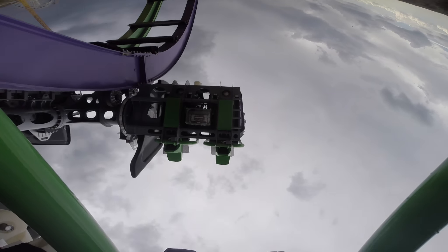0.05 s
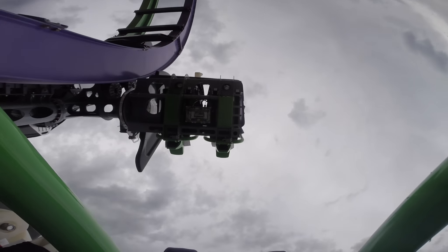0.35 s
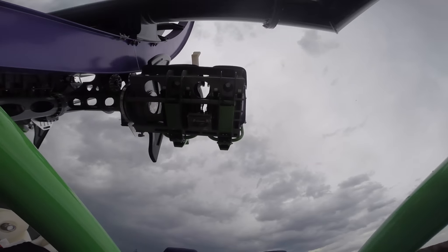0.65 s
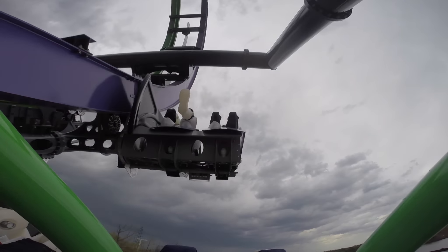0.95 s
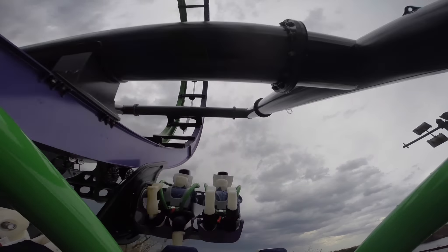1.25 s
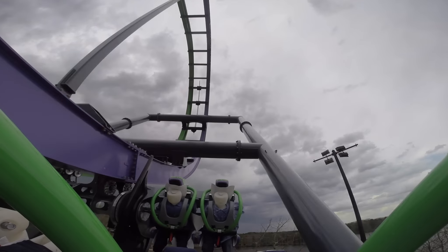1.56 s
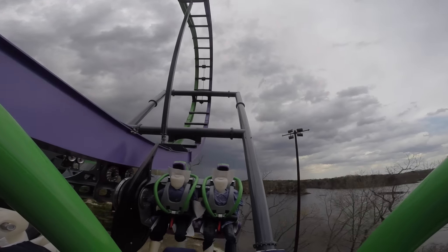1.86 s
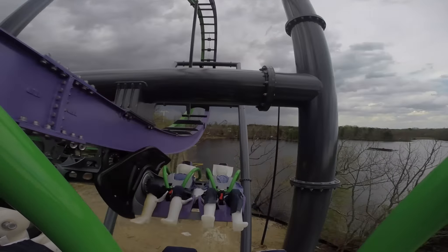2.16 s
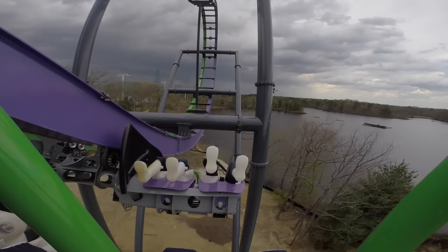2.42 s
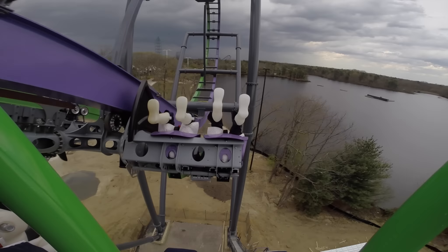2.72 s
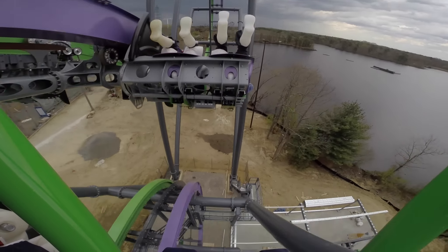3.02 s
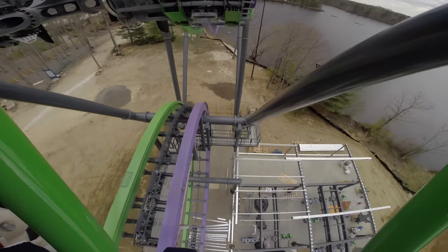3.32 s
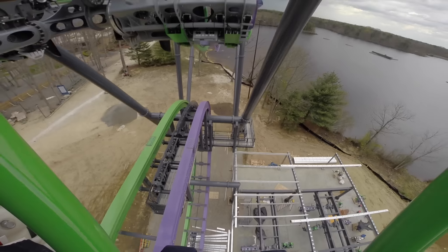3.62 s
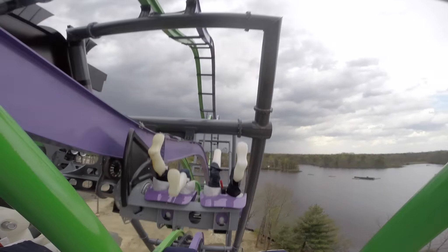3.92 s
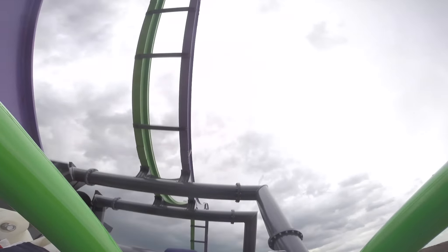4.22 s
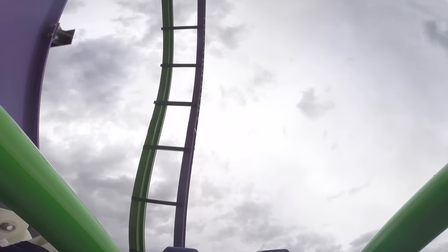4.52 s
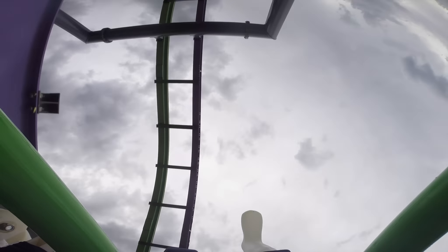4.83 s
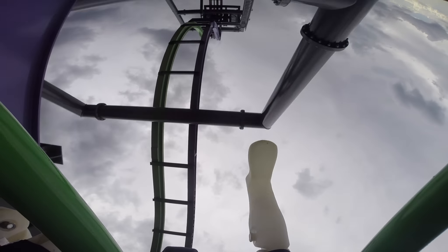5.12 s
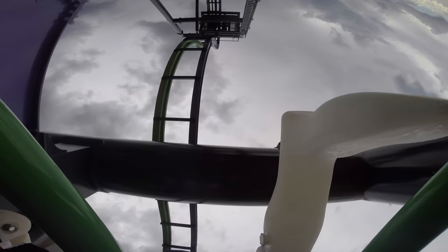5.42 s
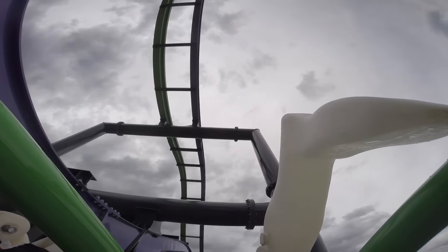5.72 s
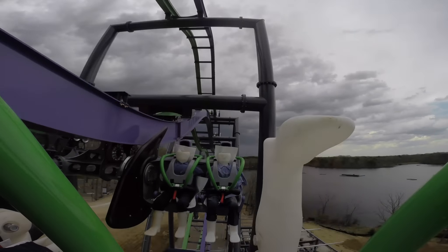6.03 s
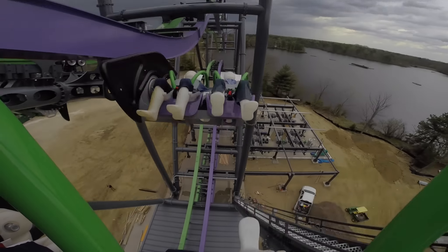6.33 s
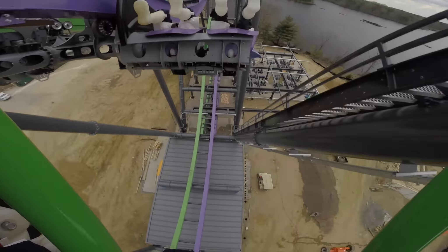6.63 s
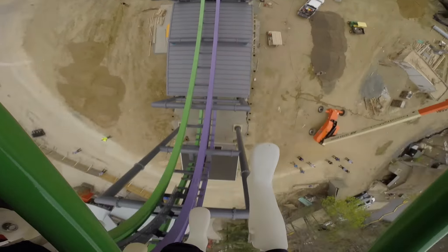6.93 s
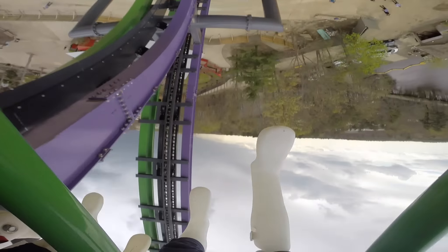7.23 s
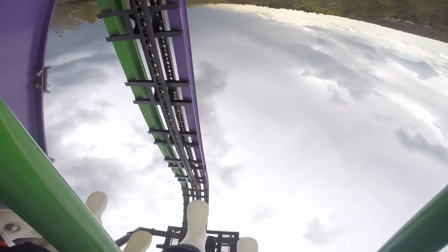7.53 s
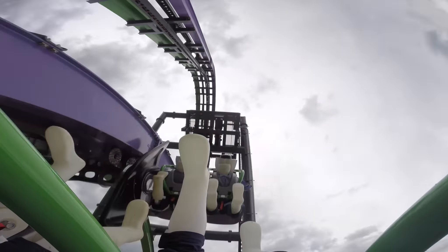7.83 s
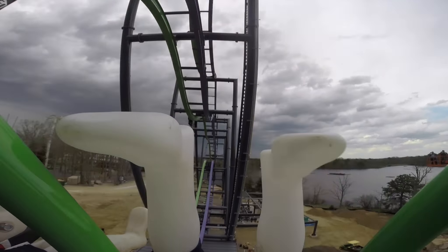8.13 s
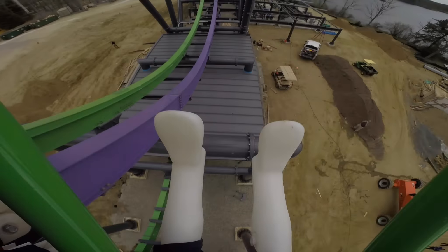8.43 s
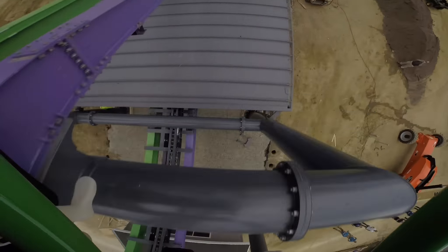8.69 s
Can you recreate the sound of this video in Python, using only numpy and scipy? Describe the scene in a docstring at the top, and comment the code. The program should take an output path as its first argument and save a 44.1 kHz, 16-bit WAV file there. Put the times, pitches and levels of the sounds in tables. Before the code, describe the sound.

A roller coaster car drones deeply throughout, throbbing and swelling over a low wheel roar and faint hiss, heard from inside a housing fixed to the seat. Wind buffets the microphone hard for the first half second, then eases, leaving the rumble, light crackles and weaker gusts. Strong, sputtering wind returns from 3 to 3.9 seconds with small knocks and faint pings. Another blast comes at about 4.5 seconds with sharp knocks, followed by a ringing steel clank and rattle around 4.7. Track joints thump dully near 2.4, 3.6, 4.7, 5.4, 6.6, 7.5 and 8.1 seconds, heaviest at 5.4. Moderate gusts come and go between 5 and 6.2 seconds, then drop back. The wind surges again from 7.2 to 8 seconds. A sharp tick strikes the housing at about 8.5, and a last strong gust and jolt arrive around 8.7.

```python
"""A roller coaster car drones deeply as the track forces its main resonance into vibration.
It is heard from inside a housing fixed to the seat. The wheels roar and hiss, joints jolt and clank,
loose parts knock, a thin panel pings, metal squeaks and the strained mount crackles.
Whenever the seat turns into the airstream, turbulence buffets the housing and sputters in its
resonances; air hisses at its seams, and small hard objects tick against it."""
import sys
import numpy as np
from scipy import signal
from scipy.fft import rfft, irfft, next_fast_len
from scipy.io import wavfile
from scipy.ndimage import uniform_filter1d

SR = 44100
rng = np.random.default_rng(int(sys.argv[2]) if len(sys.argv) > 2 else 0)


def file_out(sig):
    """Save sig as 16-bit WAV at sys.argv[1]."""
    # one column per channel
    cols = np.atleast_2d(sig).T
    # limit, then scale
    lim = np.clip(cols, -1, 1)
    pcm = np.round(lim * 32767).astype(np.int16)
    wavfile.write(sys.argv[1], SR, pcm)


N = 390726
TIME = np.arange(N) / SR

# Level curves. Each row: time in seconds, level in dB.
SEAM_LEVEL = [(0, -84), (1.5, -78.5), (2.0, -77), (3.5, -76.5), (3.9, -84.5), (6.3, -86.5), (6.9, -82),
              (8.86, -86.5)]
CRACKLE_LEVEL = [(0, -54), (.1, -56), (.2, -49), (.3, -66), (.7, -71), (.8, -55), (1.35, -60), (1.65, -54),
                 (1.85, -68.5), (2.65, -54.5), (3.0, -76), (3.9, -77.5), (5.5, -76), (6.6, -58),
                 (8.3, -65.5), (8.7, -49)]
HISS_LEVEL = [(0, -75.5), (.6, -59.5), (.92, -61.5), (.98, -71), (1.04, -56), (1.2, -62.5), (1.6, -56.5),
              (1.85, -62.5), (2.4, -61.5), (3.2, -60.5), (3.8, -66), (5.3, -68.5), (6.5, -62.5),
              (7.45, -62), (8.2, -67), (8.86, -64.5)]
ROAR_LEVEL = [(0, -32.5), (.5, -36.5), (1.1, -44.5), (2.3, -44), (2.7, -49.5), (3.6, -42), (4.3, -48.5),
              (4.9, -48), (6.5, -37.5), (7.05, -47), (7.35, -35.5), (8, -39), (8.35, -45), (8.6, -35),
              (8.86, -40)]
DRONE_LEVEL = [(0, -27), (1.5, -22), (1.95, -26), (2.3, -24.5), (2.7, -29.5), (3.4, -28), (4.4, -31.5),
               (6.2, -29.5), (6.6, -31), (7.2, -30), (8.86, -32)]
# Noise spectra. Each row: frequency in Hz, relative spectral density in dB.
CRACK_SPECTRUM = [(700, 7), (2200, 8), (3700, -1.5), (5200, -8), (6400, -8), (8000, -15.5), (10800, -16.5),
                  (15000, -34)]
TICK_SPECTRUM = [(1500, -27), (2300, 9), (4000, -7), (7400, -6), (9500, -3), (10500, -15), (12000, -10),
                 (15000, -7)]
RATTLE_SPECTRUM = [(1000, -7.5), (2500, 2), (3600, 1.5), (5200, -3), (6400, -1), (8000, -12), (11000, -18),
                   (15000, -27.5)]
CLANK_SPECTRUM = [(500, -14), (1200, -6), (2000, -2), (3000, 4.5), (4200, -3), (5000, -15), (5800, -5.5),
                  (7800, -27), (11000, -28.5), (15000, -43)]
SWISH_SPECTRUM = [(600, -19), (1500, -3), (2300, -1.5), (3100, 1.5), (4000, -11.5), (5000, -21.5),
                  (6000, -20), (9000, -37)]
HISS_SPECTRUM = [(150, -2.5), (300, 3.5), (520, 1), (950, 2), (1180, -6), (1700, -1.5), (2400, -7),
                 (3500, -6), (4100, -14.5), (4550, -12), (5200, -24), (6100, -21.5), (8000, -24.5),
                 (11000, -28.5), (15000, -42)]
ROAR_SPECTRUM = [(85, -19.5), (115, 7), (150, 0), (200, -5), (280, -10), (400, -27), (800, -41)]
SWAY_SPECTRUM = [(12, -11), (20, 1), (27, -11), (38, -10.5), (50, -13), (64, -5), (80, -24), (100, -38)]
# Brief events. Each row: start in seconds, level in dB.
SQUEAKS = [(.61, -80.5), (4.9, -84.5), (8.075, -82)]
CRACKS = [(0.807, -52), (.84, -62), (0.906, -51), (0.921, -53), (0.94, -50), (1.146, -55), (1.299, -48.5),
          (1.657, -48), (1.71, -57), (1.748, -51), (2.199, -53), (2.392, -49), (2.683, -66), (6.721, -57)]
PINGS = [(2.542, -58), (2.57, -55), (2.635, -62), (2.695, -60), (2.766, -53), (3.6, -33.5), (3.745, -40.5),
         (3.783, -43.5), (3.933, -41), (5.027, -35.5), (8.548, -35.5), (8.629, -38), (8.731, -31)]
TICKS = [(4.391, -44.5), (4.424, -53), (8.4713, -20.5)]
# Modes of housing and steel frame. Each row: frequency in Hz, gain in dB, 60 dB decay (t60) in seconds.
TICK_MODES = [(2400, -15, .016), (2950, -18, .014), (3400, -19, .014), (4650, -19, .01), (5900, -15, .011),
              (6600, -14, .009), (7450, -3, .007), (8400, -13, .009), (10500, -11, .004)]
FRAME_MODES = [(3020, -2.5, .4), (3180, -4, .45), (4076, -11, .5), (5580, -14, .5), (6698, -9, 0.19)]
# The frame's crowded modes: lowest and highest frequency in Hz.
FRAME_BAND_HZ = [1800, 9000]
# Loose parts, plus a few sharp eddy slaps on the housing (at 3.037 s and 4.544 to 4.566 s), all as damped
# gliding tones. Each row: start in seconds, pitch in Hz, level in dB, t60 in seconds, glide in octaves.
KNOCKS = [(1.821, 1980, -47.5, 0.042, 1.2), (2.991, 2340, -38.5, .023, -0.15),
          (3.037, 2366, -31.5, 0.022, -0.36), (3.089, 663, -34.5, 0.074, -1.65),
          (3.21, 460, -31.5, 0.12, -1.86), (3.254, 348, -36, .09, -0.15), (4.544, 2168, -21, 0.012, -0.09),
          (4.549, 2210, -22, 0.023, 0.2), (4.566, 730, -28, 0.061, -0.67), (4.891, 406, -34, 0.066, 0.3),
          (5.1, 678, -35, 0.037, -0.62), (5.958, 343, -31, 0.063, -0.4), (7.133, 1210, -36, 0.048, 1.44),
          (7.157, 759.8, -46, 0.065, 0.41), (8.659, 3574, -32, 0.014, 0.073),
          (8.817, 425, -37.5, .035, -.3)]
# Track joints. Each row: start in seconds, thump level in dB, rattle level in dB.
JOLTS = [(0.084, -40, -58), (0.181, -35, -61), (0.2, -25, -66), (0.801, -32, -62.5), (2.388, -22, -70),
         (2.475, -20.5, -70), (2.974, -48, -56.5), (3.647, -18.5, -75), (4.612, -36, -46),
         (4.719, -18, -50), (5.392, -13, -54.5), (5.408, -26, -64), (6.579, -18, -65), (7.55, -18, -66.5),
         (8.066, -21, -48.5), (8.082, -25, -75), (8.744, -18, -55)]
# Blows on steel. Each row: start in seconds, level in dB, t60 in seconds.
CLANKS = [(4.61, -40.5, 0.91), (4.709, -40, 0.22)]
# Passing girders. Each row: time in seconds, level in dB, half width in seconds.
GIRDERS = [(2.322, -64.5, .05), (4.314, -60.5, 0.062), (5.673, -62.5, 0.099), (5.829, -54.5, 0.055),
           (7.192, -50, 0.015), (8.257, -64, 0.053)]
# Turns into the airstream. Each row: time of full strength in seconds, hold in seconds, level in dB,
# bass boost in dB, fall in dB per second.
GUSTS = [(0, 0.11, 0.5, 2.5, 98.5), (0.104, 0.11, 3, -2, 48.5), (0.806, 0.035, -14, 4, 72.5),
         (1.425, 0.22, -15, -4, 107), (2.553, 0.11, -20, -25, 62), (3.109, 0.099, 2.5, -6, 112),
         (3.458, 0.23, 4.5, -0.5, 118), (3.776, 0.18, -8, -8, 107), (4.4, .01, -5, -6.5, 87),
         (4.521, 0.071, 1, -0.5, 122), (4.71, 0.03, 0, 1.5, 42), (5.023, 0.04, -3.5, 5, 93),
         (5.16, 0.21, -6, 1.5, 202), (5.6, 0.26, -11, -3, 60.5), (5.915, 0.23, -6, -4, 35),
         (6.303, 0.039, -13.5, -17, 53), (6.945, 0.016, -11.5, -2, 115), (7.235, 0.28, -2, -5, 97),
         (7.52, 0.097, -10.5, 12.5, 95), (7.685, 0.11, -1.5, 2, 108), (7.913, 0.06, 5.5, 2, 111.5),
         (8.265, 0.043, -10, -1.5, 3), (8.673, 0.032, 7.5, -9.5, 102)]
# The bass boost fades out across this band: lower and upper edge in Hz.
BASS_FADE_HZ = [700, 1200]
# Resonances of the housing. Each row: frequency in Hz, width in Hz, level in dB.
HOUSING_MODES = [(283, 160, -49), (468, 392, -44.5), (862.5, 95, -50.5), (1170, 160, -48),
                 (1400, 420, -55.5), (2050, 510, -52.5), (2350, 310, -52.5), (2558, 290, -54.5),
                 (3600, 290, -65), (4584, 220, -72), (5780, 670, -76.5), (8800, 6700, -85)]
# Eddies that slap the housing. Each row: start in seconds, level in dB, centre in Hz,
# spread in octaves, t60 in seconds.
EDDIES = [(0.01, -19.5, 740, 0.37, 0.028), (.082, -34, 2400, 0.49, 0.032), (0.101, -35, 2400, .6, 0.03),
          (0.153, -28, 2370, 0.14, 0.013), (2.68, -34, 3030, 0.28, 0.027), (2.924, -42, 2400, 0.5, 0.026),
          (3.093, -23, 2947, 0.19, 0.025), (3.119, -33.5, 2470, 0.49, 0.05),
          (3.163, -26, 2410, 0.54, 0.022), (3.183, -29, 2450, 0.5, 0.015), (3.209, -32, 2450, 0.24, 0.04),
          (3.233, -30.5, 2533, 0.25, 0.02), (3.251, -29.5, 2500, 0.19, 0.015),
          (3.342, -33.5, 560, 1, 0.053), (3.365, -28, 1020, 0.88, 0.054), (3.393, -22, 2000, 1, 0.013),
          (3.601, -41, 2200, 0.45, 0.023), (3.628, -37, 2280, 0.44, .05), (3.646, -31, 550, 0.92, 0.041),
          (3.814, -40, 2400, .5, 0.021), (3.982, -47, 2130, .3, 0.02), (4.454, -38.5, 571, 0.71, 0.036),
          (4.497, -31.5, 453, 0.95, 0.032), (4.505, -26, 1300, 1.26, 0.025), (4.535, -33, 2350, .25, 0.023),
          (4.547, -31, 550, 0.75, 0.024), (4.565, -21.5, 493, 0.7, 0.021), (4.692, -37, 2400, 0.52, 0.025),
          (4.737, -36, 600, 1.1, 0.028), (4.777, -36, 2300, .5, .02), (4.885, -40, 2440, 0.28, 0.022),
          (4.936, -36.5, 2400, 0.23, 0.018), (5.058, -47, 500, 0.88, .03),
          (5.148, -39.5, 2410, 0.65, 0.028), (5.162, -40, 2395, 0.45, 0.041),
          (5.198, -38.5, 2480, 0.37, 0.039), (5.246, -36.5, 2100, 0.18, 0.021),
          (5.275, -28.5, 2457, 0.14, 0.022), (5.361, -36, 2450, 0.55, 0.025),
          (5.378, -30, 2340, 0.68, 0.033), (5.784, -43.5, 600, 2.4, 0.068), (5.964, -36, 2300, 0.43, 0.018),
          (5.98, -41, 447, 0.6, 0.041), (6.004, -35, 1470, 0.52, 0.015), (6.148, -41.5, 1800, 1.4, 0.05),
          (6.372, -33.5, 1510, 0.4, 0.02), (7.238, -27, 464, 0.88, 0.029), (7.256, -35, 2400, 0.28, 0.032),
          (7.311, -35, 2400, 0.49, 0.024), (7.331, -28.5, 503, 1.34, 0.053), (7.438, -35, 2450, 0.27, .025),
          (7.452, -22, 1100, 0.8, 0.026), (7.509, -33, 2284, 0.75, 0.027), (7.82, -38, 2400, 0.22, 0.023),
          (7.868, -37, 399, 1.1, 0.017), (7.883, -35, 2440, 0.55, 0.024), (7.961, -36.5, 1510, 1.6, 0.031),
          (8.291, -34.5, 2542, 0.25, 0.022), (8.547, -32, 1979, .7, 0.025), (8.554, -34, 2403, 0.51, 0.055),
          (8.61, -26, 1710, 1.8, 0.038), (8.659, -34, 2700, 0.42, 0.013), (8.729, -34, 1700, 1.34, 0.024)]
# Mode strength against which a slap is shared out. Each row: frequency in Hz, level in dB.
SLAP_REFERENCE = [(700, -45), (1200, -42.5), (2000, -45.5)]
# Bends press wheels into rails. Each row: time and length in seconds, drone and roar levels in dB.
BENDS = [(.02, 0.049, -22.5, -61), (0.241, 0.041, -17.5, -34.5), (0.4, 0.052, -22, -51),
         (0.825, 0.05, -24.5, -32), (1.5, 0.033, -24.5, -50), (1.303, 0.018, -25.5, -49),
         (2.158, 0.074, -18.5, -41.5), (3.259, 0.14, -25.5, -64), (3.524, 0.061, -25, -28),
         (3.673, 0.03, -15, -40), (4.018, 0.019, -22.5, -57), (4.104, .03, -46, -35),
         (4.522, 0.057, -45, -33.5), (4.643, 0.062, -17.5, -56), (4.756, 0.074, -21, -30.5),
         (4.96, 0.061, -23.5, -42), (5.077, 0.12, -35, -35.5), (5.182, 0.059, -36, -32.5),
         (5.399, 0.034, -36, -27), (5.68, 0.061, -24.5, -40), (5.959, 0.057, -41, -52),
         (5.807, 0.036, -50, -34), (6.03, 0.035, -18, -39), (6.369, 0.015, -22, -35),
         (6.533, 0.077, -22.5, -39), (6.699, 0.092, -19, -61), (6.974, 0.046, -23, -50),
         (7.571, 0.014, -17.5, -25.5), (7.742, 0.093, -22, -50), (7.99, 0.039, -26, -29.5),
         (8.081, 0.016, -18.5, -28), (8.362, 0.46, -38.5, -56), (8.702, 0.32, -27.5, -47)]
# The car goes light. Each row: time and length in seconds, depth in dB.
LULLS = [(0.494, 0.046, 6), (0.67, 0.078, 10.5), (1.002, .025, 12), (1.065, 0.019, 10), (1.426, 0.024, 16),
         (1.792, 0.09, 16.5), (2.57, 0.058, 8), (3.884, 0.091, 16), (4.863, 0.012, 16), (5.327, 0.072, 7),
         (5.529, 0.092, 27), (6.213, 0.029, 18), (6.786, 0.11, 15), (7.467, 0.046, 9), (7.855, 0.032, 11)]
# The seat swings on its pivot. Each row: time in seconds, level in dB.
SWINGS = [(.16, -29), (.88, -25), (1.2, -32), (1.6, -41), (1.97, -37), (2.32, -28), (3.101, -27.5),
          (4.17, -29.5), (4.43, -33.5), (5.95, -33), (6.599, -27), (7.08, -31.5), (7.52, -30.5),
          (8.45, -28.5)]
# The car's resonance stiffens under load. Each row: time in seconds, frequency in Hz.
DRONE_PITCH = [(0, 77.7), (.55, 85.63), (.7, 78.7), (1.15, 87.33), (1.5, 91.57), (1.85, 80.43),
               (2.13, 98.4), (2.6, 82.4), (5.4, 81.1), (5.75, 76.6), (6.05, 82.27), (6.7, 76.44),
               (7.55, 73.45), (8, 79.35), (8.86, 83.1)]


def from_db(db):
    """Amplitude grows tenfold with every 20 dB."""
    return np.exp(np.asarray(db) * (np.log(10) / 20))


def rms_one(x):
    """Normalisation to unit power."""
    return x / np.sqrt(np.mean(x ** 2) + 1e-20)


def in_time(curve):
    """Linear interpolation of a curve at every sample."""
    return np.interp(TIME, *np.transpose(curve))


def noise(spectrum):
    """Spectral shaping of white noise, at unit power, with steep skirts beyond the given band."""
    hz, db = np.transpose(spectrum)
    size = next_fast_len(N)
    log_hz = np.log(np.maximum(np.arange(size // 2 + 1) * SR / size, 1))
    beyond = np.abs(log_hz - np.clip(log_hz, np.log(hz[0]), np.log(hz[-1])))
    gain = from_db(np.interp(log_hz, np.log(hz), db) - 40 * beyond)
    return rms_one(irfft(rfft(rng.standard_normal(size)) * gain, size)[:N])


def drift(rate_hz):
    """Low-passed noise gives a smooth fluctuation of unit spread, its extremes rounded off."""
    step, settle = 40, 2000
    pole = np.exp(-2 * np.pi * rate_hz * step / SR)
    white = rng.standard_normal(N // step + settle + 2)
    slow = signal.lfilter([1], [1, -2 * pole, pole * pole], white)[settle:]
    rounded = rms_one(np.tanh(rms_one(slow) / 2))
    return np.interp(np.arange(N) / step, np.arange(len(slow)), rounded)


def rough_noise(spectrum, depth_db, rate_hz):
    """Random amplitude modulation roughens a noise of unit power."""
    return rms_one(noise(spectrum) * from_db(depth_db * drift(rate_hz)))


def resonant_noise(hz, width_hz):
    """Two resonators in series select a steep-sided band of noise, at unit power."""
    r = np.exp(-np.pi * width_hz / SR)
    section = [(1 - r * r) / 2, 0, (r * r - 1) / 2, 1, -2 * r * np.cos(2 * np.pi * hz / SR), r * r]
    return rms_one(signal.sosfilt([section, section], rng.standard_normal(N)))


def ring(clicks, hz, t60):
    """A damped oscillator answers each impulse with a decaying sine of the same height."""
    r, w = from_db(-60 / (t60 * SR)), 2 * np.pi * hz / SR
    return signal.lfilter([0, np.sin(w)], [1, -2 * r * np.cos(w), r * r], clicks + 1e-18)


def clicks_at(times, db):
    """Ideal impacts: one impulse at each time."""
    out = np.zeros(N)
    out[np.clip(np.round(np.asarray(times) * SR).astype(int), 0, N - 1)] = from_db(db)
    return out


def bursts(times, db, rise_s, t60):
    """Transient envelopes: a quick rise, then exponential decay."""
    out = np.zeros(N + 2 * SR)
    for s, gain, rise, length in zip(*np.broadcast_arrays(times, from_db(db), rise_s, t60)):
        age = np.arange(int(length * SR)) / SR
        shape = (1 - np.exp(-(age / rise) ** 2)) * from_db(-60 * age / length)
        start = int(np.clip(s * SR, 0, N))
        out[start:start + len(age)] += gain * shape / shape.max()
    return out[:N]


def swell(s, length_s):
    """A Gaussian bell in time; its length is the full width at half height."""
    return np.exp2(-np.minimum((2 * (TIME - s) / length_s) ** 2, 60))


def squeaks(fundamental_hz=3060):
    """Friction of metal on metal sounds a second and a third harmonic."""
    phase = 2 * np.pi * fundamental_hz * TIME
    tone = np.sin(2 * phase) + from_db(-2) * np.sin(3 * phase)
    return bursts(*np.transpose(SQUEAKS), rise_s=0.03, t60=0.23) * tone


def seam_hiss():
    """Flow noise at the housing's seams fills one thin, high band."""
    return from_db(in_time(SEAM_LEVEL)) * resonant_noise(hz=5920, width_hz=990)


def mount_crackle():
    """Stick-slip: the strained mount yields in many faint slips and a few clear cracks."""
    place, size = rng.random((200, 2)).T
    slips = bursts(place * N / SR, 10 * size - 2.5, rise_s=0.00048, t60=0.012)
    cracks = bursts(*np.transpose(CRACKS), rise_s=0.00056, t60=0.013)
    return (from_db(in_time(CRACKLE_LEVEL)) * slips + cracks) * noise(CRACK_SPECTRUM)


def panel_pings(hz=1203, t60=0.053, scatter=0.0187):
    """Free vibration of a thin panel, at a slightly different pitch for each tap."""
    pitches = hz * (1 + rng.uniform(-scatter, scatter, len(PINGS)))
    return sum(bursts([s], [db], rise_s=0.0012, t60=t60) * np.sin(2 * np.pi * pitch * TIME)
               for (s, db), pitch in zip(PINGS, pitches))


def housing_ticks(crack_db=-8):
    """A small, hard impact gives a broadband crack and excites the housing's high modes."""
    at, level_db = np.transpose(TICKS)
    impacts = clicks_at(at, level_db)
    modes = sum((-1) ** k * from_db(db) * ring(impacts, hz, t60)
                for k, (hz, db, t60) in enumerate(TICK_MODES))
    return modes + bursts(at, level_db + crack_db, rise_s=0.0001, t60=0.0083) * noise(TICK_SPECTRUM)


def knocks(wobble_rad=0.54, rough_db=2.5):
    """Loose parts chatter, and a few hard eddies slap the housing, in damped, gliding tones, randomly modulated
    in phase and level."""
    out, chatter = np.zeros(N), wobble_rad * drift(150)
    for s, hz, db, t60, glide in KNOCKS:
        near = slice(int(s * SR), int((s + t60) * SR))
        pitch = hz * 2 ** (glide * (TIME[near] - s) / t60)
        phase = 2 * np.pi * np.cumsum(pitch) / SR + chatter[near]
        out[near] += bursts([s], [db], rise_s=0.0012, t60=t60)[near] * np.sin(phase)
    return out * from_db(rough_db * drift(130))


def mode_cloud(s, db, t60):
    """Crowded inharmonic frame modes; damping rises with frequency, and t60 holds at 3000 Hz."""
    place, phases = rng.random(size=(70, 2)).T
    low, high = FRAME_BAND_HZ
    hz = low * (high / low) ** place
    age = np.arange(int(t60 * SR)) / SR
    gains = from_db(np.interp(hz, *np.transpose(CLANK_SPECTRUM)))
    gains = gains / np.sqrt(np.sum(gains ** 2) / 2)
    cloud = sum(gain * from_db(-60 * age / t60 * np.sqrt(f / 3000)) * np.sin(2 * np.pi * (f * age + p))
                for gain, f, p in zip(gains, hz, phases))
    return from_db(db) * np.pad(cloud, (int(s * SR), N))[:N]


def steel_clanks(modes_db=-13.5, cloud_db=-6, wash_db=-3):
    """Lightly damped steel rings on after a blow: clear modes, crowded modes and a wash of noise."""
    blows = clicks_at(*np.transpose(CLANKS)[:2])
    modes = sum(from_db(db + modes_db) * ring(blows, hz, t60) for hz, db, t60 in FRAME_MODES)
    cloud = sum(mode_cloud(s, db + cloud_db, t60) for s, db, t60 in CLANKS)
    wash_power = sum(bursts([s], [db + wash_db], rise_s=0.00082, t60=t60) ** 2 for s, db, t60 in CLANKS)
    return modes + cloud + np.sqrt(wash_power) * rough_noise(CLANK_SPECTRUM, depth_db=0.5, rate_hz=180)


def joint_jolts():
    """Impulse excitation: each track joint thumps the car and rattles its fittings."""
    at, thump_db, rattle_db = np.transpose(JOLTS)
    thumps = ring(clicks_at(at, thump_db), hz=74.86, t60=0.32)
    thumps = signal.sosfilt(signal.butter(2, 200, fs=SR, output="sos"), thumps)
    shaking = bursts(at, rattle_db, rise_s=0.02, t60=0.028)
    return thumps + shaking * rough_noise(RATTLE_SPECTRUM, depth_db=3.5, rate_hz=200)


def wheels(roar_db, hiss_db):
    """Rolling noise is a lumpy roar and a grainy hiss; its reflections swish from passing girders."""
    roar = from_db(roar_db) * rough_noise(ROAR_SPECTRUM, depth_db=4, rate_hz=21)
    hiss = from_db(hiss_db) * rough_noise(HISS_SPECTRUM, depth_db=2, rate_hz=74)
    passing = sum(from_db(db) / (1 + ((TIME - s) / half_s) ** 2) for s, db, half_s in GIRDERS)
    return roar + hiss + passing * noise(SWISH_SPECTRUM)


def airstream(calm_db=-23, rise_db_per_s=153):
    """Gusts build, hold and fall, adding in power; gives their level and bass boost in dB."""
    power = bass_power = from_db(calm_db) ** 2
    for s, hold_s, db, bass_db, fall_db_per_s in GUSTS:
        before_db = rise_db_per_s * np.maximum(s - TIME, 0)
        after_db = fall_db_per_s * np.maximum(TIME - s - hold_s, 0)
        gust = from_db(db - np.minimum(before_db + after_db, 100)) ** 2
        power = power + gust
        bass_power = bass_power + gust * from_db(bass_db) ** 2
    return 10 * np.log10(power), 10 * np.log10(bass_power / power)


def eddy_slaps(hz, mode_db, gain_db=-5, focus_db=5, treble_db_per_octave=-4.5):
    """Envelope of one mode: an eddy excites it most when it is strong and near the eddy's centre."""
    at, level_db, centre_hz, spread, t60 = np.transpose(EDDIES)
    off_centre_db = focus_db * (np.log2(min(hz, 3000) / centre_hz) / spread) ** 2
    share_db = mode_db - np.interp(hz, *np.transpose(SLAP_REFERENCE))
    tilt_db = treble_db_per_octave * max(np.log2(hz / 2800), 0)
    return bursts(at, level_db - off_centre_db + share_db + tilt_db + gain_db, rise_s=0.1 * t60, t60=t60)


def wind(gain_db=-1.5, buffet_db=2.5, patchy_db=3, treble_growth=1.43):
    """Turbulence excites every resonance of the housing; small eddies sputter, single ones slap."""
    level_db, bass_db = airstream()
    shared_db = buffet_db * drift(18)
    sputter_at = rng.uniform(0, N / SR, size=300)
    out = np.zeros(N)
    for hz, width_hz, mode_db in HOUSING_MODES:
        sputter = bursts(sputter_at, rng.uniform(-10, 1.6, len(sputter_at)), rise_s=0.00088, t60=0.0094)
        flutter = rms_one(np.hypot(from_db(shared_db + patchy_db * drift(71)), sputter))
        bass_share = np.interp(hz, BASS_FADE_HZ, [1, 0])   # big, slow eddies reach only the low modes
        drive_db = level_db * (treble_growth if hz > 4000 else 1)
        flow = from_db(drive_db + gain_db + mode_db + bass_share * bass_db) * flutter
        air = resonant_noise(hz, width_hz)
        even_air = air / np.sqrt(uniform_filter1d(air ** 2, size=180) + 0.03)   # a slap is a solid push
        out += flow * air + eddy_slaps(hz, mode_db) * even_air
    return out


def track_load(roar_share=0.33, hiss_share=0.18):
    """Vibration follows wheel load, up in bends and down in lulls; gives drone, roar and hiss in dB."""
    drone_power = from_db(in_time(DRONE_LEVEL)) ** 2
    roar_power = from_db(in_time(ROAR_LEVEL)) ** 2
    for s, length_s, drone_db, roar_db in BENDS:
        press = swell(s, length_s)
        drone_power += press * from_db(drone_db) ** 2
        roar_power += press * from_db(roar_db) ** 2
    lull_db = sum(db * swell(s, length_s) for s, length_s, db in LULLS)
    return (10 * np.log10(drone_power) - lull_db,
            10 * np.log10(roar_power) - roar_share * lull_db,
            in_time(HISS_LEVEL) - hiss_share * lull_db)


def seat_sway(rest_db=-34.5, swing_s=0.23):
    """Low-frequency vibration of the seat gains power with each swing on its pivot."""
    power = from_db(rest_db) ** 2 + sum(from_db(db) ** 2 * swell(s, swing_s) for s, db in SWINGS)
    return np.sqrt(power) * noise(SWAY_SPECTRUM)


def car_drone(level_db, gain_db=-0.8, wander_hz=6.53, evenness=0.91, throb_db=2.5, top_hz=107):
    """Forced vibration: rough track drives the car's main resonance at random amplitude and phase."""
    phasor = (drift(wander_hz) + 1j * drift(wander_hz)) / np.sqrt(2)
    # the shaking never rests, so dips in amplitude are shallow
    local_power = uniform_filter1d(np.abs(phasor) ** 2, size=1800) + 1e-4
    phasor = phasor / local_power ** (evenness / 2)
    phase = 2 * np.pi * np.cumsum(in_time(DRONE_PITCH)) / SR
    drone = np.real(phasor * np.exp(1j * phase)) * from_db(throb_db * drift(15))
    through_seat = signal.sosfilt(signal.butter(8, top_hz, fs=SR, output="sos"), drone)
    return from_db(level_db + gain_db) * rms_one(through_seat)


def scene(notch_hz=932, notch_width_hz=170, notch_depth=0.73):
    """Superposition at one point; the housing weakens a narrow band of the airborne sound."""
    drone_db, roar_db, hiss_db = track_load()
    airborne = wheels(roar_db, hiss_db) + wind() + seam_hiss() + joint_jolts() + steel_clanks()
    band = signal.lfilter(*signal.iirpeak(notch_hz, notch_hz / notch_width_hz, fs=SR), airborne)
    rumble = car_drone(drone_db) + seat_sway()
    small_parts = mount_crackle() + knocks() + panel_pings() + squeaks() + housing_ticks()
    return (airborne - notch_depth * band + rumble + small_parts)[None, :]


def record(dry, ceiling=0.36, stop_hz=16000):
    """Soft saturation rounds the peaks; a steep low-pass filter cuts the highest treble."""
    rounded = ceiling * np.tanh(dry / ceiling)
    return signal.sosfilt(signal.cheby2(14, 60, stop_hz, fs=SR, output="sos"), rounded)


dry = scene()
out = record(dry)
file_out(out)
```